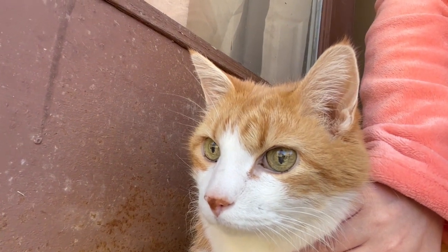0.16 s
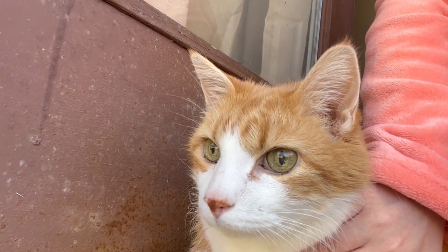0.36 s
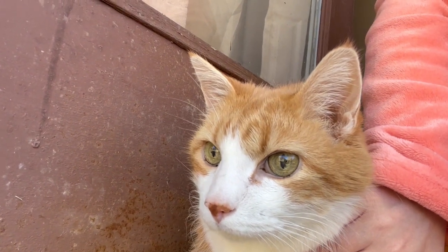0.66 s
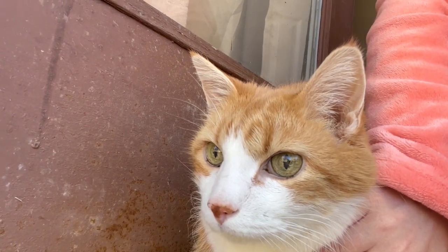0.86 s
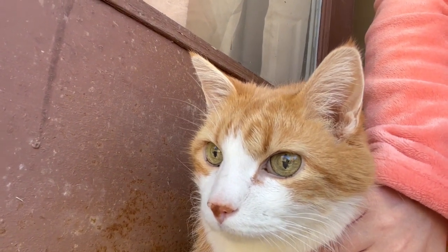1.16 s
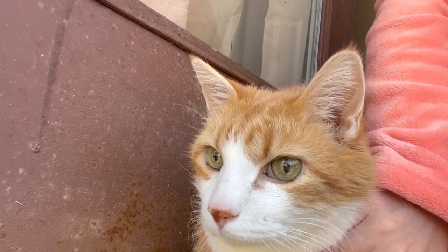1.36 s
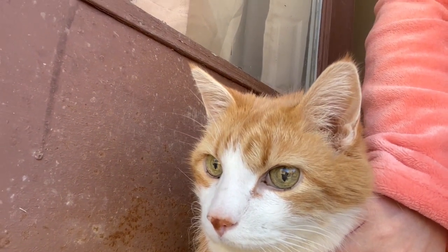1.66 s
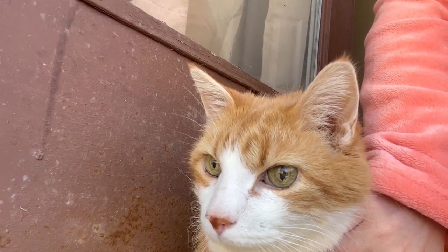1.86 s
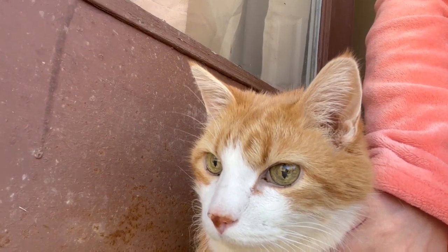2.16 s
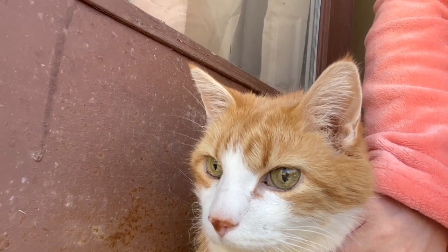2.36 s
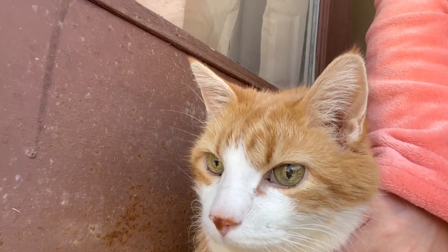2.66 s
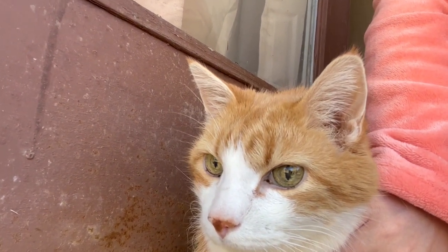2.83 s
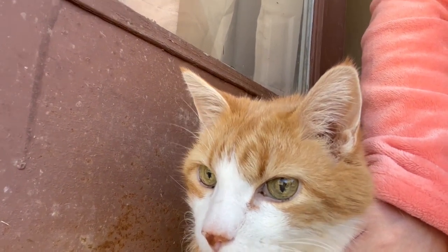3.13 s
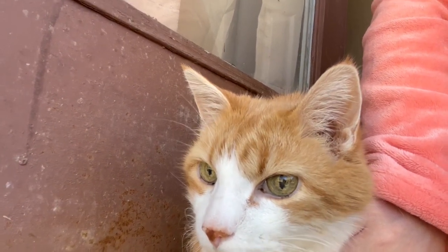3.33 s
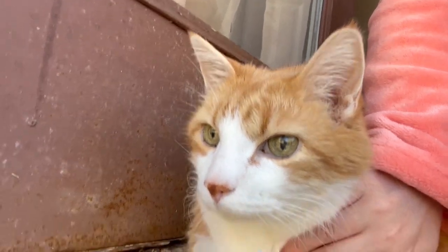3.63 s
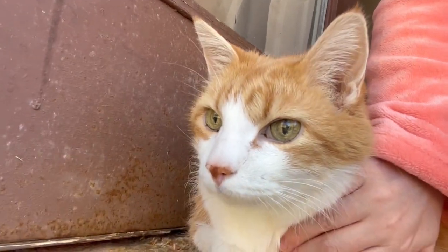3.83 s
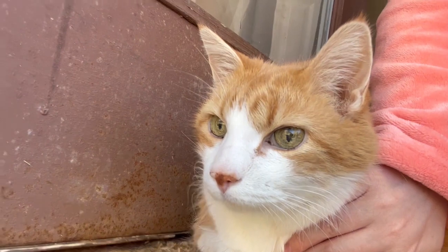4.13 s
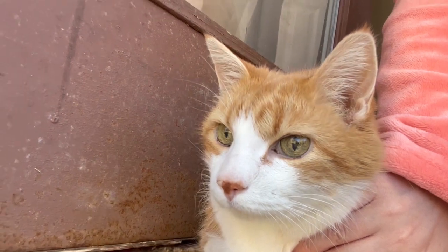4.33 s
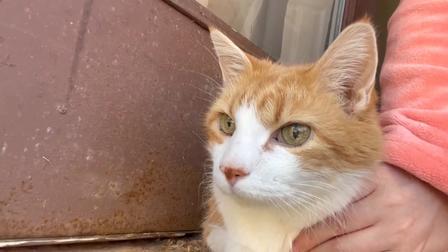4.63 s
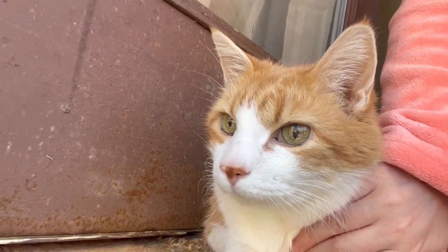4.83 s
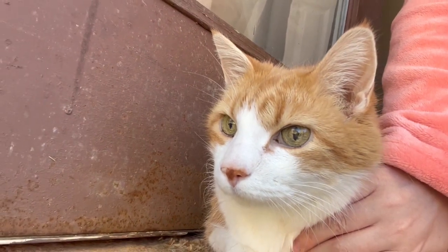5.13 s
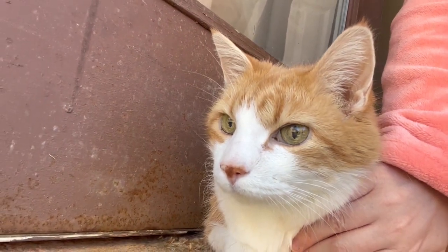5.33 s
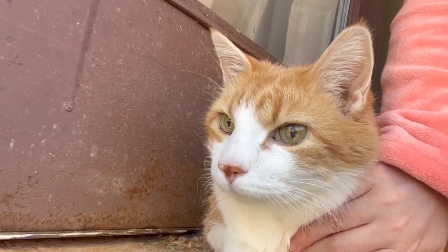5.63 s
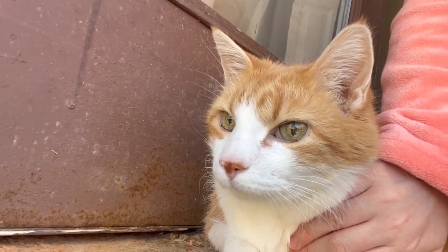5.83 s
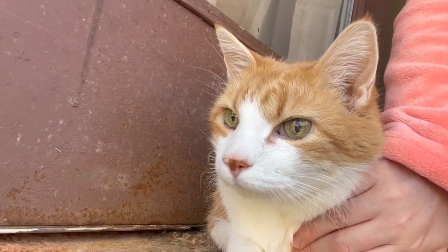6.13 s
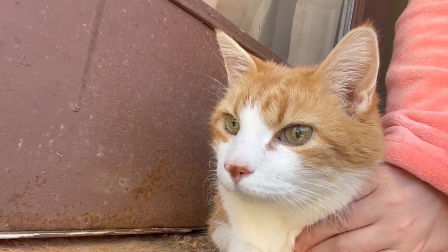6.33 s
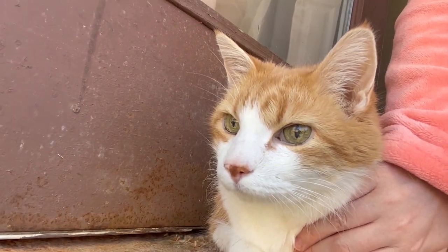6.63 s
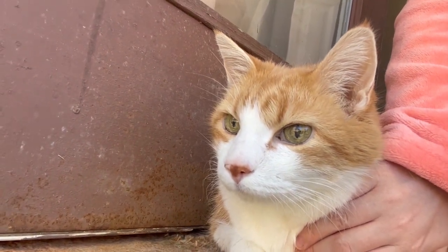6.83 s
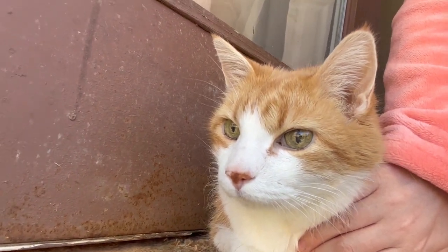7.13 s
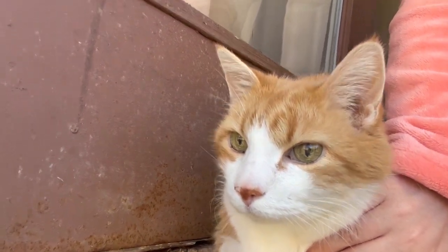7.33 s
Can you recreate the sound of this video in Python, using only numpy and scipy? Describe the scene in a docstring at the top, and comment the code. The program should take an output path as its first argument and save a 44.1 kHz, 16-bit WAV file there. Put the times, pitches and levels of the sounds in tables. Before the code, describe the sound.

Seven brief, piercing, birdlike chips come from the far right, slightly irregular, with a longer gap in the middle. Each bounces off nearby walls. One thin arched whistle slips in just before the sixth. Low fan drone, distant rumble and faint hiss continue throughout; a faint high insect rasp is heard only at first. Vehicles grow louder at the close, with light handling sounds near the small stereo microphones.

```python
"""Chipping animal in a town yard

A small animal chips about once a second from the right: gliding sines, with wall echoes and a noise tail.
A fan unit drones (narrow noise bands, a steady sine) over town rumble, hiss and passing traffic (coloured
noise) that swells at the end. An insect buzzes (throbbing resonant noise) until about 1.7 s. One long whistle,
and a few ticks, taps (struck modes) and a cloth rustle (noise) close to the microphones."""
import sys
import numpy as np
from scipy import signal
from scipy.fft import rfft, irfft, next_fast_len
from scipy.io import wavfile
from scipy.ndimage import uniform_filter1d

SR = 44100
rng = np.random.default_rng(int(sys.argv[2]) if len(sys.argv) > 2 else 0)


def to_wav(sig):
    """Store sig (one row per channel, or 1-D mono) as 16-bit WAV at the path in sys.argv[1].

    Samples outside -1..1 are clipped; the rate is SR.
    """
    pcm = np.clip(np.atleast_2d(sig), -1, 1) * 32767
    pcm = np.round(pcm).astype(np.int16)
    wavfile.write(sys.argv[1], SR, pcm.T)  # frames by channels


N = 329868


def from_db(db):
    """Amplitude gain of a level in dB."""
    return 10 ** (np.asarray(db) / 20)


def rms_one(x):
    """Scales to rms 1."""
    return x / np.sqrt(np.mean(x ** 2) + 1e-20)


def in_time(rows):
    """Gain per sample from rows of t/s, level/dB."""
    t_s, level_db = np.transpose(rows)
    return from_db(np.interp(np.arange(N) / SR, t_s, level_db))


def at_hz(points, hz):
    """Straight lines on a log-frequency axis."""
    f, value = np.transpose(points)
    return np.interp(np.log(hz + 1), np.log(f + 1), value)


def resonance(x, hz, width_hz):
    """Two-pole resonance, about unit gain at its peak."""
    r = np.exp(-np.pi * width_hz / SR)
    poles = [1, -2 * r * np.cos(2 * np.pi * hz / SR), r * r]
    return signal.lfilter([(1 - r * r) / 2, 0, (r * r - 1) / 2], poles, x)


def shaky(size):
    """Smoothed random curve, rms 1; size is the smoothing length in samples."""
    smooth = uniform_filter1d(rng.standard_normal(N), size)
    return rms_one(uniform_filter1d(smooth, size))


# Shared power between microphones: f/Hz, share (0-1)
SHARED_POWER = [(60, 0.96), (120, 0.96), (230, 0.78), (400, 0.15), (900, 0.53), (2000, 0.21), (5000, 0.39),
                (8000, 0.8), (13000, 0)]
# Phase lead of the left: f/Hz, phase/rad
LEFT_LEAD = [(100, 0), (340, 0.67), (600, 1.7), (950, 2.5), (1460, 3.5), (2070, 6.5), (2840, 5.5),
             (3300, 4), (4200, 6), (6000, 1.5), (12000, 2)]
# Left minus right: f/Hz, level/dB
LEFT_TILT = [(60, -3), (100, -0.5), (160, -2), (260, 8), (420, -2.5), (900, 2.5), (1800, -6.5),
             (2920, -6.5), (4740, -2.5), (8000, -0.5)]


def diffuse_pair():
    """Noise spectra at two spaced microphones: a phase-shifted shared part plus a part of each."""
    size = next_fast_len(N)
    hz = np.arange(size // 2 + 1) * SR / size
    shared, left, right = rfft(rng.standard_normal((3, size)))
    alike = at_hz(SHARED_POWER, hz)
    side = np.array([[.5], [-.5]])
    common = np.sqrt(alike) * shared * np.exp(1j * side * at_hz(LEFT_LEAD, hz))
    own = np.sqrt(1 - alike) * np.array([left, right])
    return hz, (common + own) * from_db(side * at_hz(LEFT_TILT, hz))


def plain_noise():
    """Diffuse stereo noise without added colour."""
    return irfft(diffuse_pair()[1])[:, :N]


def coloured(spectrum):
    """Diffuse stereo noise with the given spectrum; rms 1."""
    hz, pair = diffuse_pair()
    return rms_one(irfft(pair * from_db(at_hz(spectrum, hz)))[:, :N])


# Rumble spectrum, relative: f/Hz, density/dB per Hz
RUMBLE_SPECTRUM = [(15, -49), (25, -14.5), (45, -12.5), (62, -1), (75, -6.5), (100, -9.5), (140, -12),
                   (200, -13), (255, -21), (330, -20), (381, -25), (498, -29.5), (651, -28), (1000, -35.5),
                   (1110, -37.5), (1780, -42.5), (2600, -50), (3200, -57.5), (5190, -62), (7000, -95)]
RUMBLE_DB = -36  # level before swell


def rumble():
    """Distant town: bass-heavy diffuse noise."""
    return from_db(RUMBLE_DB) * coloured(RUMBLE_SPECTRUM)


# Fan and motor bands: f/Hz, width of each of two passes/Hz, level before swell/dB
DRONE_BANDS = [(85.78, 10.5, -38), (119.96, 12.5, -42.5), (167.9, 10.5, -46.5), (309.9, 23, -53),
               (337.5, 10.5, -54), (648, 17, -59.5)]
MOTOR_MEAN_HZ, MOTOR_DB = 84.17, -40.5  # level before swell


def drone():
    """Fan and motor: noise in narrow bands plus a slightly wavering sine core."""
    air = plain_noise()
    bands = 0
    for hz, width_hz, level_db in DRONE_BANDS:
        narrow = resonance(resonance(air, hz, width_hz), hz, width_hz)
        bands = bands + from_db(level_db) * rms_one(narrow)
    turning_hz = MOTOR_MEAN_HZ * (1 + 0.01586 * shaky(size=6000))
    core = np.sqrt(2) * np.sin(2 * np.pi * np.cumsum(turning_hz) / SR)
    return bands + from_db(MOTOR_DB) * core


# Swell of rumble and drone together: t/s, level/dB
TOWN_LEVEL = [(0, 1.5), (1.2, .5), (3.2, -1), (5.5, 0), (7.48, -.5)]


def town():
    """Rumble and drone under one slow level curve."""
    return in_time(TOWN_LEVEL) * (rumble() + drone())


def passing(vehicles):
    """Gain falls as one over distance; powers add."""
    t = np.arange(N) / SR
    power = sum(from_db(db) ** 2 / (1 + ((t - near_s) / reach_s) ** 2) for near_s, db, reach_s in vehicles)
    return np.sqrt(power)


# Vehicle spectra, relative: f/Hz, density/dB per Hz
CAR_SPECTRUM = [(400, -29.5), (700, 0), (1000, 7), (1200, 0), (1650, 1), (2200, -16), (3500, -29),
                (6000, -36.5)]
LORRY_SPECTRUM = [(300, -35), (450, 0.5), (650, 7), (900, 8), (1050, -9.5), (1500, -44.5)]
# Passes: t when nearest/s, level then/dB, time to cover the nearest distance/s
CAR_PASSES = [(.45, -64, 1), (4.8, -67.5, 0.25), (6.55, -66.5, .25), (7.55, -48, 0.19)]
LORRY_PASSES = [(2.0, -62.5, 0.8), (7.2, -51.5, 1.37)]


def traffic():
    """Coloured noise rising and falling with each vehicle's distance."""
    cars = passing(CAR_PASSES) * coloured(CAR_SPECTRUM)
    lorries = passing(LORRY_PASSES) * coloured(LORRY_SPECTRUM)
    return cars + lorries


# Hiss spectrum, relative: f/Hz, density/dB per Hz
HISS_SPECTRUM = [(2000, -9), (4000, -1.5), (6000, -3), (9000, -4), (10500, -8), (13500, -7), (15000, -16)]
HISS_DB = -73.5


def hiss():
    """Constant faint treble noise."""
    return from_db(HISS_DB) * coloured(HISS_SPECTRUM)


# Wing resonances: f/Hz, width of first pass/Hz, relative level/dB
WING_BANDS = [(4370, 170, -10), (4810, 140, -6), (5020, 320, -5), (5260, 250, -9)]
THROB_MEAN_HZ, THROB_DEPTH = 19, 0.14
BUZZ_START_DB, BUZZ_SAG_DB_PER_S = -65.5, 1
BUZZ_STOP_S, BUZZ_FADE_DB_PER_S = 1.665, 480


def insect():
    """Rasping noise, throbbing at an uneven rate, through the wing resonances."""
    rate_hz = THROB_MEAN_HZ * (1 + .15 * shaky(size=5000))
    throb = 1 + THROB_DEPTH * np.sin(2 * np.pi * np.cumsum(rate_hz) / SR)
    rasp = plain_noise() * throb
    bands = 0
    for hz, width_hz, level_db in WING_BANDS:
        narrow = resonance(rasp, hz, width_hz)
        bands = bands + from_db(level_db) * resonance(narrow, hz, 3.0 * width_hz)
    t = np.arange(N) / SR
    fade_db = BUZZ_FADE_DB_PER_S * np.clip(t - BUZZ_STOP_S, 0, 1)
    level_db = BUZZ_START_DB - BUZZ_SAG_DB_PER_S * t - fade_db
    return from_db(level_db) * rms_one(bands)


CENTRE_HZ = 3500  # pitch swings scale about this


def silent_voice():
    """Rows of pitch in Hz and gain, silent."""
    return np.array([np.full(N, float(CENTRE_HZ)), np.zeros(N)])


def add(voice, t_s, hz, db):
    """Writes one gliding note into the pitch and gain rows."""
    at = np.arange(round(t_s[0] * SR), round(t_s[-1] * SR))
    voice[0, at] = np.interp(at / SR, t_s, hz)
    voice[1, at] = from_db(np.interp(at / SR, t_s, db))


FLUTTER_DB, WOBBLE_HZ = 2.5, 55  # rms at shake 1


def sung(voice, haze, shake):
    """Sine on the pitch row, unsteady in level and pitch, with a noisy haze."""
    pitch_hz, gain = uniform_filter1d(voice, size=40)  # rounds corners
    pitch_hz = pitch_hz + shake * WOBBLE_HZ * shaky(size=50)
    flutter = from_db(shake * FLUTTER_DB * shaky(size=60))
    unsteady = flutter + haze * shaky(size=32)
    return gain * unsteady * np.sin(2 * np.pi * np.cumsum(pitch_hz) / SR)


def breath(t_s, puffs):
    """Level in dB: the strongest puff at each moment."""
    peak_s, rise_s, fall_s, db = np.transpose(puffs)[:, :, None]
    slope_s = np.where(t_s < peak_s, rise_s, fall_s)
    return np.max(db - 10 * ((t_s - peak_s) / slope_s) ** 2, axis=0)


# Chips: t/s, level/dB, pitch factor, swing factor, length factor, lead-in start f/Hz, lead-in end f/Hz,
#   lead-in level/dB, scoop level/dB, drop level/dB, lead-in peak t/s before stretch
CHIP_ROWS = [(.561, -37, 1.004, 1.03, 1.01, 5000, 4850, -25, -2.5, 0, -.046),
             (1.439, -39.5, 1.01, 1.053, 0.99, 5100, 4900, -16, 2.5, 1, -0.05),
             (2.24, -40.5, 0.99, 1.07, 1.0, 5450, 4750, -14.5, 3, 1, -.041),
             (3.101, -40.5, 0.99, 1.13, 0.99, 5350, 4400, -4.5, -1.5, 3, -0.034),
             (4.819, -43, 1.02, 0.776, 0.95, 5450, 4920, -17, -2.5, -3, -0.038),
             (6.073, -39, 1.004, 0.98, 1, 5450, 5240, -24, 2, -2.5, -.047),
             (7.278, -40.5, 1.035, 0.86, 0.99, 5460, 5230, -20, -1, -2, -.046)]
# Pitch turns from chip time, before stretch, swing and pitch factors: t/s, f/Hz
UPBEAT_TURNS = [(-.076, 3200), (-.058, 3750)]
MAIN_TURNS = [(-.033, 3950), (-.029, 3480), (-.022, 3450), (-.014, 3720), (-.009, 3150), (.007, 3900),
              (.014, 4180), (.019, 3700), (.023, 3080), (.044, 2850)]
# High lead-in, before stretch: start t/s, end t/s
LEAD_IN_SPAN_S = (-.055, -.037)
# Breath puffs (upbeat, lead-in, scoop, arch, drop), before stretch; each chip sets the lead-in's t and
#   offsets three levels: peak t/s, rise for 10 dB/s, fall for 10 dB/s, level/dB
BREATH_PUFFS = [(-.064, .011, .004, -25), (0, .014, .005, 0), (-.021, .013, .008, -4),
                (.001, .009, .018, 0), (.024, .010, .008, -3)]
# Faint short notes before, between and after the chips, one of them like an echo of the arch:
#   t/s, length/s, start f/Hz, end f/Hz, level/dB
FAINT_NOTES = [(1.207, .03, 3650, 3840, -60), (2.395, .022, 3520, 3740, -58),
               (3.032, .016, 3900, 4310, -59), (4.761, 0.015, 3930, 3540, -54),
               (4.855, 0.035, 4150, 4100, -54)]
CHIP_HAZE_DB = -11.5


def caller():
    """One warble per chip, scaled in time and pitch, each with its own lead-in and breath levels.

    Faint short notes before, between and after the chips, one of them like an echo of the arch."""
    voice = silent_voice()
    up_s, up_hz = np.transpose(UPBEAT_TURNS)
    turn_s, turn_hz = np.transpose(MAIN_TURNS)
    t_s = np.linspace(up_s[0], turn_s[-1], num=120)
    for (at_s, level_db, pitch, swing, length, start_hz, end_hz,
         lead_db, scoop_db, drop_db, lead_s) in CHIP_ROWS:
        up = pitch * (CENTRE_HZ + swing * (up_hz - CENTRE_HZ))
        turns = pitch * (CENTRE_HZ + swing * (turn_hz - CENTRE_HZ))
        glide_hz = np.interp(t_s, [*up_s, *LEAD_IN_SPAN_S, *turn_s], [*up, start_hz, end_hz, *turns])
        puffs = np.array(BREATH_PUFFS, dtype=float)
        puffs[:, 3] += [0, lead_db, scoop_db, 0, drop_db]
        puffs[1, 0] = lead_s
        add(voice, at_s + length * t_s, glide_hz, level_db + breath(t_s, puffs))
    part = np.array([0, .25, .75, 1])
    for at_s, length_s, start_hz, end_hz, note_db in FAINT_NOTES:
        glide_hz = start_hz + (end_hz - start_hz) * part
        add(voice, at_s + length_s * part, glide_hz, note_db + np.array([-9, -2.0, -1, -2]))
    return sung(voice, from_db(CHIP_HAZE_DB), shake=1)


def delayed(x, lag_s):
    """Delay by interpolation."""
    return np.interp(np.arange(N) - lag_s * SR, np.arange(N), x)


# Wall echoes: delay t/s, level/dB
WALL_ECHOES = [(.0035, -12), (.0095, -13), (.037, -20), (.051, -17.5)]
# Off-axis colour: f/Hz points; level/dB there, one row each for left scatter, right scatter, wall echoes
ASIDE_POINTS_HZ = [2900, 4100, 5200]
ASIDE_COLOURS_DB = [(-3, 1.5, 6), (1, -1.5, 5), (1.5, -1, -2)]
SCATTER_DB, SCATTER_T60_S, LEFT_SCATTER_DB = -3.5, 0.38, -8
YARD_S, BEYOND_DB = 0.079, -4  # scatter from beyond the far wall is weaker
LEFT_DB, LEFT_LAG_S = -14, .00032  # caller sits far right


def yard(x, echo_db):
    """Direct sound, wall echoes and an independent scattered tail per side."""
    hz = np.arange(N // 2 + 1) * SR / N
    colours_db = [np.interp(hz, ASIDE_POINTS_HZ, db) for db in ASIDE_COLOURS_DB]
    aside = irfft(rfft(x) * from_db(colours_db), N)
    t = np.arange(SR // 2) / SR
    beyond_db = BEYOND_DB * np.clip((t - YARD_S) / .01, 0, 1)
    tail = rng.standard_normal((2, len(t))) * from_db(-60 * t / SCATTER_T60_S + beyond_db)
    tail /= np.sqrt(np.sum(tail ** 2, axis=1, keepdims=True))
    scatter = from_db(SCATTER_DB + echo_db) * signal.fftconvolve(aside[:2], tail, axes=1)[:, :N]
    echoes = sum(from_db(db + echo_db) * delayed(aside[2], lag_s) for lag_s, db in WALL_ECHOES)
    left = from_db(LEFT_DB) * (delayed(aside[0], LEFT_LAG_S) + echoes)
    return np.array([left, x + echoes]) + scatter * from_db([[LEFT_SCATTER_DB], [0]])


def struck(events, modes):
    """A click per touch rings all the decaying modes."""
    clicks = np.full((2, N), 1e-18)
    for t_s, db, pan_db in events:
        clicks[:, round(t_s * SR)] = from_db(db + np.array([.5, -.5]) * pan_db)
    out = 0
    for hz, db, t60_s in modes:
        r, w = from_db(-60 / (t60_s * SR)), 2 * np.pi * hz / SR
        ring = signal.lfilter([0, np.sin(w)], [1, -2 * r * np.cos(w), r * r], clicks)
        out = out + from_db(db) * ring
    return out


TICK_CUT_HZ, CLOSE_TAIL_DB, CLOSE_TAIL_T60_S = 4200, -34, .12


def close_surfaces(x):
    """Tiny contacts lack low notes; close surfaces add a short tail in a band around 7.5 kHz."""
    t = np.arange(SR // 8) / SR
    decay = from_db(CLOSE_TAIL_DB - 60 * t / CLOSE_TAIL_T60_S)
    tail = rng.standard_normal((2, len(t))) * decay * (t > .004)
    thin = signal.sosfilt(signal.butter(2, TICK_CUT_HZ, "high", fs=SR, output="sos"), x)
    return thin + resonance(signal.fftconvolve(thin, tail, axes=1)[:, :N], 7500, 4000)


# Ticks: t/s, click level/dB, left minus right/dB
TICK_EVENTS = [(.4975, -57, -2), (7.0969, -38, -3.5), (7.2245, -44, -3), (7.2425, -52, -3)]
# Tick modes: f/Hz, level/dB, t60/s
TICK_RINGS = [(6900, -1, .005), (8900, -5, .004), (11800, -12, .003), (14000, -10, .003)]


def ticks():
    """High, millisecond-long modes, thinned, with the close tail."""
    return close_surfaces(struck(TICK_EVENTS, TICK_RINGS))


# Long arched whistle: t/s, f/Hz, level/dB
WHISTLE_GLIDE = [(5.877, 2880, -68), (5.888, 2850, -53), (5.901, 2720, -53), (5.909, 2950, -45),
                 (5.921, 3500, -43), (5.927, 4200, -56), (5.936, 4650, -47), (5.952, 4830, -48),
                 (5.968, 4620, -46), (5.974, 4400, -50), (5.981, 4150, -44), (5.990, 3950, -43),
                 (5.998, 3800, -56), (6.006, 3850, -72)]
WHISTLE_HAZE_DB, WHISTLE_SHAKE, WHISTLE_ECHO_DB = -18, 1.7, -1.5


def whistler():
    """One long gliding sine, less hazy than the chips but shakier in pitch and level."""
    voice = silent_voice()
    add(voice, *np.transpose(WHISTLE_GLIDE))
    return sung(voice, from_db(WHISTLE_HAZE_DB), WHISTLE_SHAKE)


# Cloth spectrum, relative: f/Hz, density/dB per Hz
RUSTLE_SPECTRUM = [(1500, -18.5), (2800, 1.5), (4000, -2.5), (6000, -10.5), (10000, -16.5), (15000, -29)]
# Cloth level before flutter: t/s, level/dB
RUSTLE_CURVE = [(7.15, -110), (7.25, -72), (7.35, -70), (7.43, -60), (7.48, -56)]


def rustle():
    """Cloth: coloured noise with a fluttering level, 2 dB rms."""
    return in_time(RUSTLE_CURVE) * from_db(2 * shaky(size=300)) * coloured(RUSTLE_SPECTRUM)


# Taps: t/s, click level/dB, left minus right/dB
TAP_EVENTS = [(7.2275, -34, -8), (7.3115, -33, -6)]
# Tap modes: f/Hz, level/dB, t60/s
TAP_RINGS = [(420, -1, .014), (800, -6, .008), (1500, -12, .005)]


def taps():
    """Lower, short modes, dry."""
    return struck(TAP_EVENTS, TAP_RINGS)


def scene():
    """All sources as they reach the two microphones."""
    background = town() + traffic() + hiss() + insect()
    calls = yard(caller(), 0) + yard(whistler(), WHISTLE_ECHO_DB)
    near = ticks() + rustle() + taps()
    return background + calls + near


CUTOFF_HZ = 15800  # 40 dB down


def record(dry):
    """Small microphones lose the deepest bass; the top is cut."""
    thin = signal.sosfilt(signal.butter(4, 33, "high", fs=SR, output="sos"), dry)
    return signal.sosfilt(signal.cheby2(10, 40, CUTOFF_HZ, fs=SR, output="sos"), thin)


dry = scene()
out = record(dry)
to_wav(out)
```